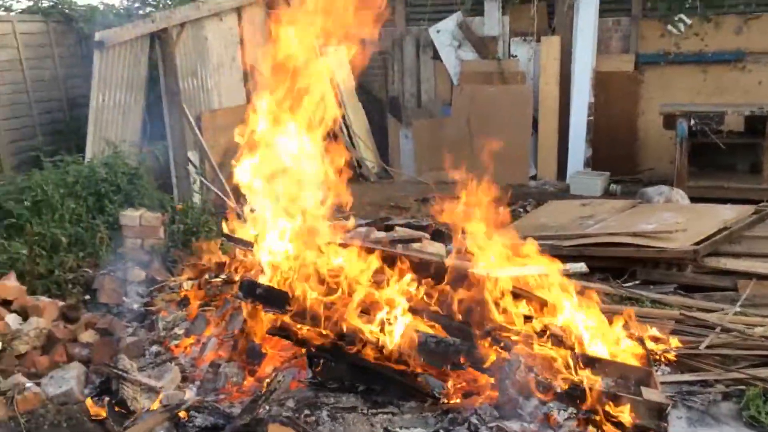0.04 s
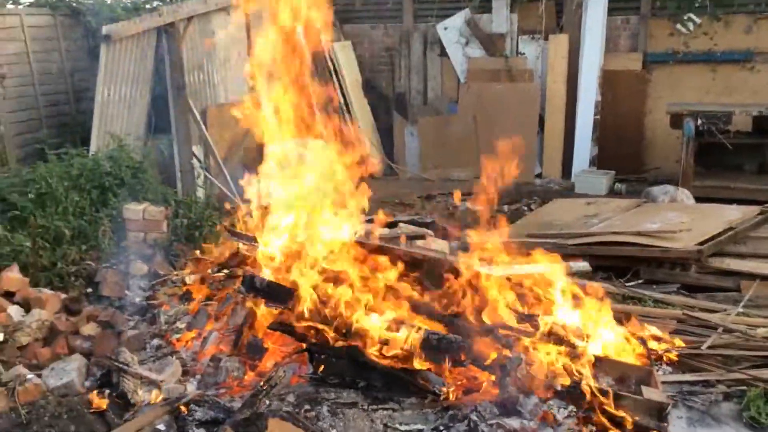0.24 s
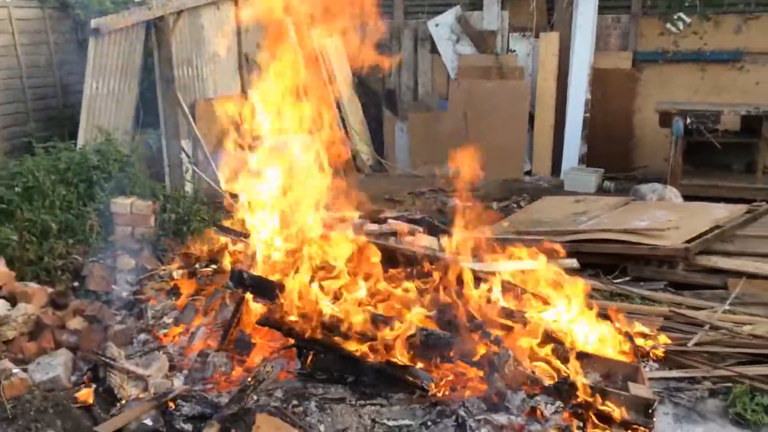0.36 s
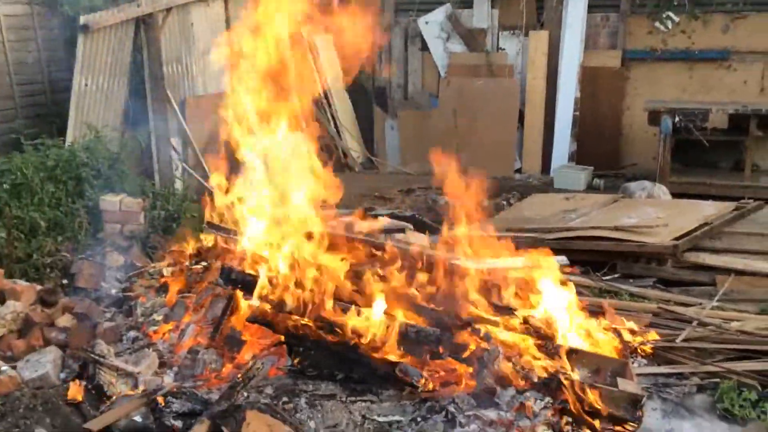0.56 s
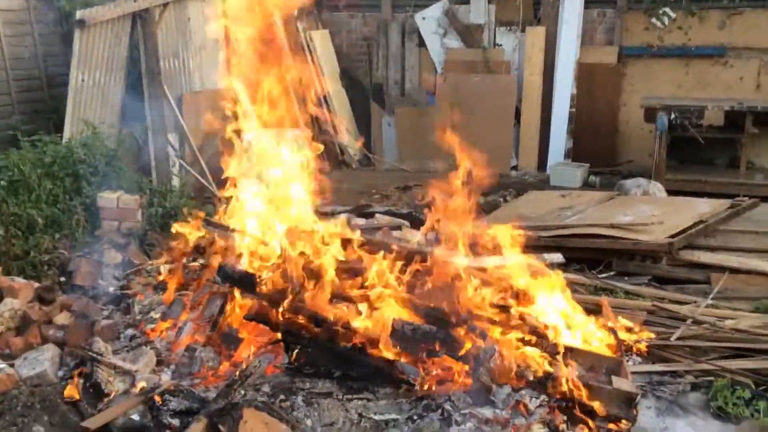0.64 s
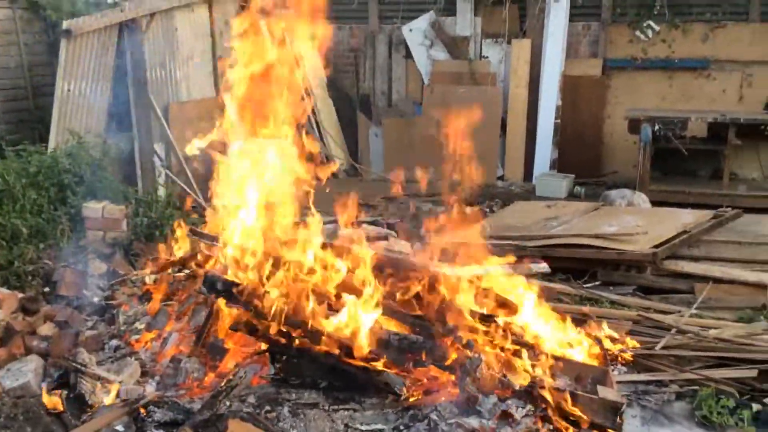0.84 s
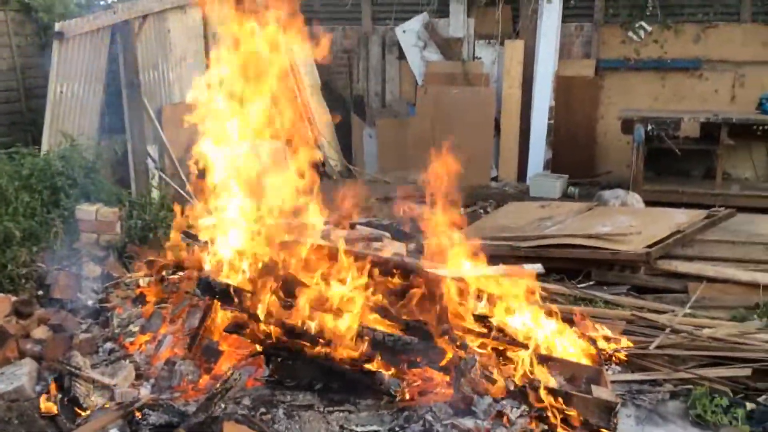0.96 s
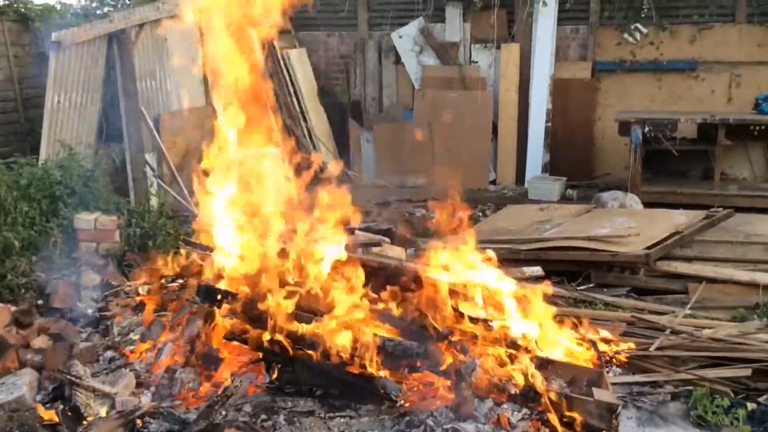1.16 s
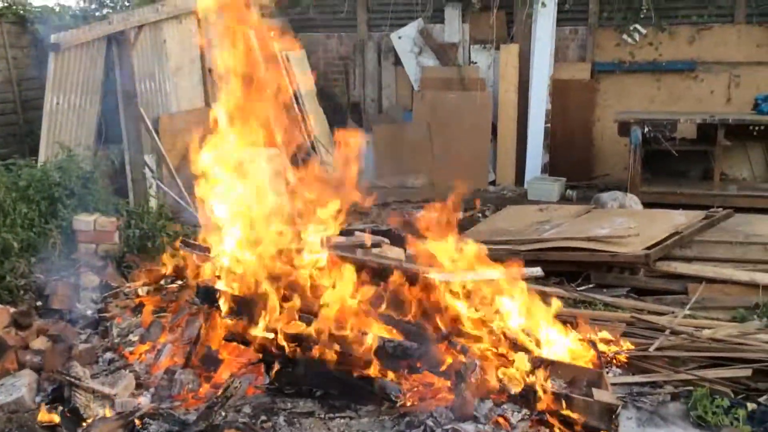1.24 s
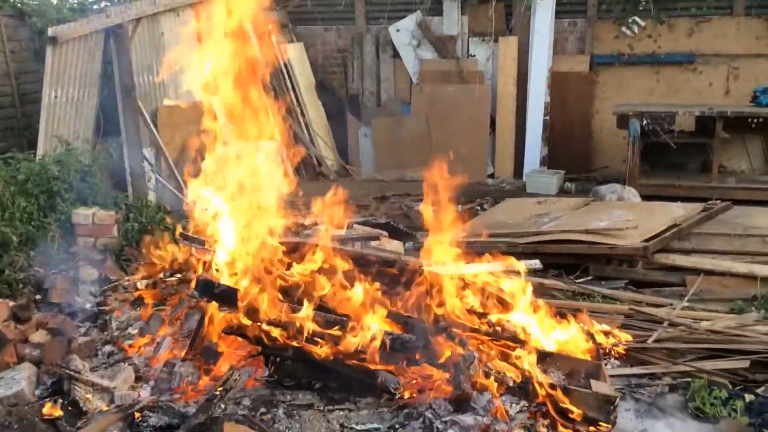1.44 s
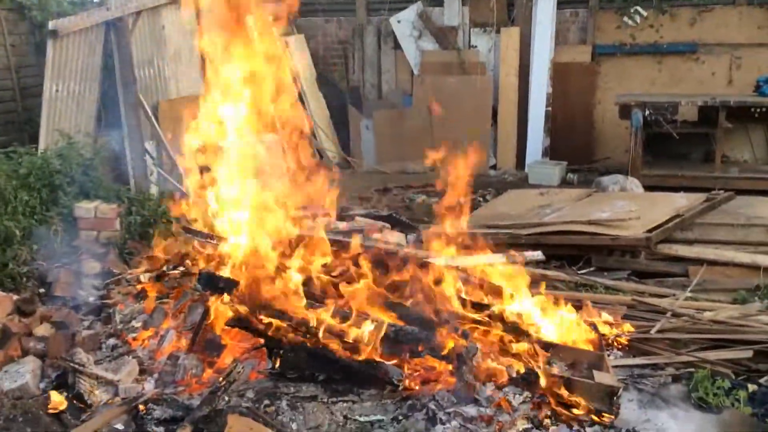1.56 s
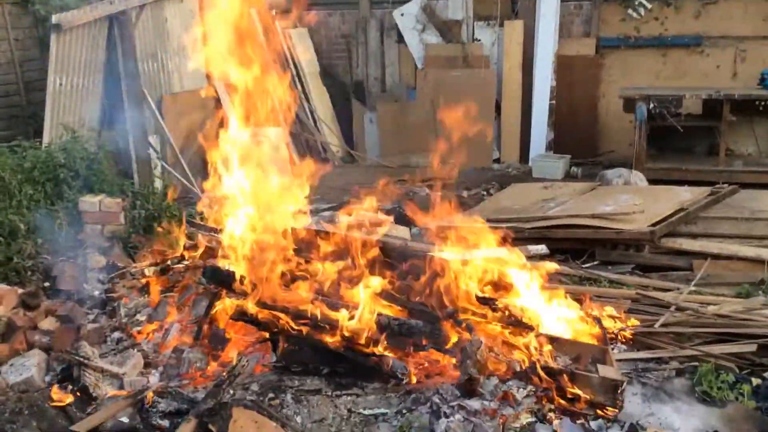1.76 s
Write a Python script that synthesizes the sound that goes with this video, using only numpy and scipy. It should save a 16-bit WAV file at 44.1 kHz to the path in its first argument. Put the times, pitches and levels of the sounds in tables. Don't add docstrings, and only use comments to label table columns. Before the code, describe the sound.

A bonfire of scrap wood a few metres away: faint ticks, then volleys of hard bright cracks with a dull board knock, thinning to small snaps; quiet fizz and low roar beneath, short yard echo, small camera microphone.

```python
import sys
import numpy as np
from scipy import signal
from scipy.fft import rfft, irfft
from scipy.io import wavfile
from scipy.ndimage import uniform_filter1d

SR = 44100
rng = np.random.default_rng(int(sys.argv[2]) if len(sys.argv) > 2 else 0)


def store_pcm(level_fs):
    pcm = np.round(np.clip(level_fs, -1, 1) * 32767).astype(np.int16)
    wavfile.write(sys.argv[1], SR, np.atleast_2d(pcm).T)


def natural_amplitude(level_db):
    exponent = np.asarray(level_db, float) / 20
    return 10 ** exponent


N = 79380

# start_s [s], level_db [dB], pitch_hz [Hz], echo_db [dB], thud_db [dB]
CRACKS = [(0.2365, -3.5, 10440, -1.5, -20.5), (0.2603, -8.5, 8600, -6.5, -25),
          (0.3238, -11.5, 6160, -6, -12.5), (0.4092, -10, 11100, -11, -11.5),
          (0.4183, -4.5, 10500, -2, -18.5), (.476, -19, 7850, -17, -37), (0.4818, -24.5, 2800, -10, -32),
          (0.5285, -31, 7200, -15, -26), (0.7322, -3, 8040, -14.5, -36), (0.8963, -24.5, 7100, 0, -37),
          (1.0106, -23, 2630, -1.5, -19), (1.0489, -12, 10600, -13, -14.5), (1.0895, -1.5, 8150, -4, -19),
          (0.7457, -16, 7300, -22, -38), (1.103, -10.5, 6660, -5, -39), (0.2508, -19, 7000, -20, -40),
          (1.406, -24, 8600, -19, -26), (1.588, -23.5, 8800, -7, -36), (1.62, -27.5, 9600, -20, -23),
          (1.682, -28, 8050, -37, -34)]
CRACK_MS = 1.0
SNAP_THUD_DB = -36
BURST_SIZE, LEAD_IN = 600, 60


def evened(x):
    return x / np.sqrt(np.mean(x ** 2) + 1e-20)


def read(points, hz):
    f, value = np.transpose(points)
    return np.interp(np.log(hz + 1), np.log(f + 1), value)


def level_over_time(points, offset_db=0):
    return natural_amplitude(offset_db + np.interp(np.arange(N) / SR, *np.transpose(points)))


def coloured(x, points):
    return irfft(rfft(x) * natural_amplitude(read(points, np.fft.rfftfreq(len(x), 1 / SR))), len(x))


def band(x, hz, q):
    hz_limit = 0.4 * SR
    return signal.lfilter(*signal.iirpeak(min(hz, hz_limit), max(q, 0.2, hz / hz_limit), SR), x)


def dying(ms, size):
    return rng.standard_normal(size) * np.exp(-np.arange(size) / (SR * max(ms, 0.05) / 1000))


def cracks(mix):
    for s, db, hz, echo_db, thud_db in CRACKS:
        add_burst(mix, s, db, hz, echo_db, thud_db, CRACK_MS, shards_db=-10)


def snaps(mix):
    snap_rows = [(0.0393, -23.5, 4000, -12, 3.44), (0.052, -31, 6200, -25, .8),
                 (.1512, -25, 7400, -4.5, 2.05), (0.303, -32, 9960, -15, 0.73),
                 (0.4056, -35, 6000, -9, 2.5), (0.5015, -30, 9000, 4.5, 0.98),
                 (0.6722, -25.5, 6940, -2.5, 1.1), (0.8415, -35.5, 4650, -1, 2),
                 (0.9956, -23.5, 11000, -5, .6), (0.9987, -17, 11900, -6, 0.55),
                 (1.3886, -20.5, 8000, -2, 1.8), (1.5026, -23.5, 6060, -5.5, 1.64),
                 (1.54, -30, 9000, -3, 1.7), (1.5468, -28, 8700, -11, 1.5),
                 (1.6988, -22.5, 11000, -8.5, 1.16)]
    for s, db, hz, echo_db, ms in snap_rows:
        add_burst(mix, s, db, hz, echo_db, SNAP_THUD_DB, ms, shards_db=1.5)


def knocks(mix):
    knock_rows = [
        (.5411, -27, 1050, -6, -6),
        (.5409, -31, 1970, -10, -20),
        (0.12, -38.5, 2000, -7, -14),
        (.5414, -43, 300, -3, -11),
        (.419, -43, 140, -7, -9.5),
        (1.389, -32, 2250, -6.5, -18),
        (.3239, -17, 3600, -8, -32),
        (.4187, -26, 2310, -2, -18),
    ]
    for row in knock_rows:
        add_burst(mix, *row, CRACK_MS, shards_db=-30, lead=0.507, bright_db=-40, dry_db=7.5)


def ticks(mix):
    tick_rows = [(.005, -47, 6000), (.026, -53, 6000), (.0834, -34, 4800), (.4877, -38, 5000),
                 (0.1192, -30, 10700), (0.1396, -36, 9200), (0.175, -42, 6800), (.195, -48, 8000),
                 (.2186, -57, 8500), (.5547, -41, 9000), (0.569, -30.5, 10100), (.616, -49, 8000),
                 (.63, -39, 8000), (.6427, -36, 10000), (0.6523, -36, 10300), (0.871, -36, 10000),
                 (.878, -42, 7950), (.946, -40, 8500), (.9645, -40, 11000), (1.038, -36, 3420),
                 (1.073, -36, 8600), (1.235, -42, 6000), (1.3083, -36.5, 11000), (1.3482, -42, 8000),
                 (1.5845, -30, 7800), (1.6066, -47, 7100), (1.647, -54, 9000), (1.7518, -32.5, 6800),
                 (1.7652, -31.5, 10000), (1.7768, -35.5, 8700)]
    for s, db, hz in tick_rows:
        add_burst(mix, s, db, hz, echo_db=-4, thud_db=SNAP_THUD_DB, ms=0.65, shards_db=-3)


def add_burst(mix, s, db, hz, echo_db, thud_db, ms, shards_db, lead=0, bright_db=-7, dry_db=0):
    low_cut = signal.butter(2, 0.35 * hz, "high", fs=SR)
    spike = pressure_spike(hz, lead, bright_db, low_cut)
    body = spike + thud(hz, lead, thud_db)
    direct = body + natural_amplitude(shards_db) * splinters(hz, ms, low_cut)
    thrown = body + natural_amplitude(shards_db) * splinters(hz, ms, low_cut)
    tail_gain = natural_amplitude(-1.5 + 0.46 * echo_db - dry_db)
    tail = tail_gain * clutter() * np.linalg.norm(direct) / np.linalg.norm(spike)
    sound = signal.fftconvolve(spike, tail)
    sound[:1799] += signal.fftconvolve(thrown, natural_amplitude(echo_db) * wall())
    sound[:BURST_SIZE] += direct
    part = mix[round(s * SR) - LEAD_IN:][:len(sound)]
    part += natural_amplitude(db) / abs(direct).max() * sound[:len(part)]


def pressure_spike(hz, lead, bright_db, low_cut):
    rise_cycles, fall_cycles = 0.34, 0.53
    turns = (np.arange(BURST_SIZE) - LEAD_IN) * hz / SR
    rise, fall = np.exp(-(turns / rise_cycles) ** 2), np.exp(-turns / fall_cycles)
    spike = -np.cos(2 * np.pi * (turns + lead)) * np.where(turns < 0, rise, fall)
    spike = signal.lfilter(*low_cut, spike)
    bright = band(-1.0 * (turns == 0), 12300, 2.07)
    return spike / abs(spike).max() + natural_amplitude(bright_db) * bright / abs(bright).max()


def thud(hz, lead, thud_db):
    kick = -np.cos(2 * np.pi * lead) * (np.arange(BURST_SIZE) == LEAD_IN)
    push = signal.lfilter(*signal.butter(1, [69.5, min(1540, hz / 2)], "band", fs=SR), kick)
    return natural_amplitude(thud_db) * push / abs(push).max()


def splinters(hz, ms, low_cut):
    noise = band(dying(ms, size=BURST_SIZE), hz, q=0.49)
    return np.roll(signal.lfilter(*low_cut, noise), LEAD_IN + 2)


def wall():
    delay_s, smear_ms, smear_db = 0.00575, 3.3, -21
    taps = np.zeros(1200)
    mirror = np.arange(400) == 0
    taps[round(delay_s * SR):][:400] = natural_amplitude(smear_db) * dying(smear_ms, size=400) + mirror
    return taps / np.linalg.norm(taps)


def clutter():
    # pitch_hz [Hz], t60_s [s]
    tail_t60 = [(1000, 0.058), (3500, 0.18), (9000, 0.17), (15000, 0.21)]
    # pitch_hz [Hz], level_db [dB]
    tail_colour = [(800, 21), (3000, 0), (7000, 1.5), (15000, 1)]
    rise_s = 0.0049
    hz, t, z = signal.stft(rng.standard_normal(9000), SR, nperseg=128)
    decay_db = read(tail_colour, hz)[:, None] - 60 * t / read(tail_t60, hz)[:, None]
    tail = signal.istft(z * natural_amplitude(decay_db), SR, nperseg=128)[1]
    tail = tail * np.minimum(np.arange(len(tail)) / (rise_s * SR), 1) ** 2
    return tail / np.linalg.norm(tail)


def fizz():
    # pitch_hz [Hz], level_db [dB per Hz]
    steam_colour = [(1000, 13), (2000, -13), (4000, -30), (8000, 16.5), (13000, 10), (15500, 25.5)]
    # time_s [s], level_db [dB]
    fizz_swell = [(0.0, -53.5), (0.154, -52), (0.284, -54.5), (0.736, -59.5), (1.002, -53), (1.148, -57),
                  (1.358, -61), (1.628, -63.5), (1.714, -54.5), (1.8, -56.5)]
    ticks_per_s, spread_db, tail_db, steam_db = 500, 5.5, -4.5, 1.5
    size = natural_amplitude(spread_db * np.minimum(rng.exponential(1, N), 3)) * (rng.random(N) < ticks_per_s / SR)
    kind = rng.integers(0, 12, N)
    tiny = np.zeros(N)
    for k, hz in enumerate(np.geomspace(2500, 13000, 12)):
        tiny += signal.oaconvolve(size * (kind == k), band(dying(1.0, size=200), hz, 0.66))[:N]
    tiny = evened(tiny)
    tiny = tiny + natural_amplitude(tail_db) * signal.fftconvolve(tiny, clutter())[:N]
    steam = evened(coloured(rng.standard_normal(N), steam_colour))
    return level_over_time(fizz_swell) * evened(evened(tiny) + natural_amplitude(steam_db) * steam)


def roar():
    # pitch_hz [Hz], level_db [dB per Hz]
    roar_colour = [(20, -36), (40, -9), (68, -5), (110, -5), (190, -5.5), (600, -15.5), (1000, -11),
                   (1700, -24)]
    # time_s [s], level_db [dB]
    roar_swell = [(0, 0), (.4, -1.5), (.8, 1), (1.1, -1), (1.3, -4), (1.8, 0)]
    patch_db, fall_db = 1.4, -15.5
    frames, hz = N // 512 + 5, np.fft.rfftfreq(2048, 1 / SR)
    a, b, patches = rng.standard_normal((frames, 1025, 3)).T
    patches = uniform_filter1d(patches, size=5, axis=0)
    patches = evened(uniform_filter1d(patches, size=5, axis=1))
    octaves_above = np.log2(np.maximum(hz / roar_colour[-1][0], 1))
    shape = read(roar_colour, hz) + fall_db * octaves_above / 2
    z = (a + 1j * b) * natural_amplitude(shape[:, None] + patch_db * patches)
    flutter = signal.istft(z, nperseg=2048, noverlap=1536)[1][:N]
    return level_over_time(roar_swell, offset_db=-54) * evened(flutter)


def hum():
    # time_s [s], level_db [dB]
    hum_swell = [(0.0, -67), (0.13, -57.5), (0.27, -67), (0.34, -57), (0.68, -74), (0.7, -66.5),
                 (1.272, -56.5), (1.318, -74), (1.378, -52.5), (1.454, -71), (1.478, -62), (1.8, -62.5)]
    pitch_hz, wander_hz = 67.8, 5.3
    wander = uniform_filter1d(rng.standard_normal(N), size=3000)
    wander = evened(uniform_filter1d(wander, size=3000))
    turns = np.cumsum(pitch_hz + wander_hz * wander) / SR
    return level_over_time(hum_swell, offset_db=-1.0) * np.sqrt(2) * np.sin(2 * np.pi * turns)


def limited(bed):
    duck_from_db, ahead_s = -26, 0.011
    for s, db, *_ in CRACKS:
        t = (np.arange(N) / SR - s) / ahead_s
        dip = np.clip(2 * (1 + t), 0, 1) * (t < 0)
        bed = bed * natural_amplitude(-max(db - duck_from_db, 0) * dip)
    return bed


def scene():
    bursts = np.zeros(N)
    for source in (cracks, knocks, snaps, ticks):
        source(bursts)
    return (bursts + limited(fizz()) + roar() + hum())[None]


def roll_off(x):
    return signal.sosfilt(signal.butter(12, 16570, fs=SR, output="sos"), x)


def record(dry):
    shelf_hz, edge_hz, shelf = 15300, 16400, natural_amplitude(-32)
    edges = [0, shelf_hz - 200, shelf_hz + 250, edge_hz, edge_hz + 300, SR / 2]
    gains = [1, 1, shelf, shelf, 0, 0]
    taps = signal.firwin2(numtaps=401, freq=edges, gain=gains, fs=SR, window=("kaiser", 6))
    return roll_off(signal.oaconvolve(dry, taps[None], "same"))


dry = scene()
out = record(dry)
store_pcm(out)
```